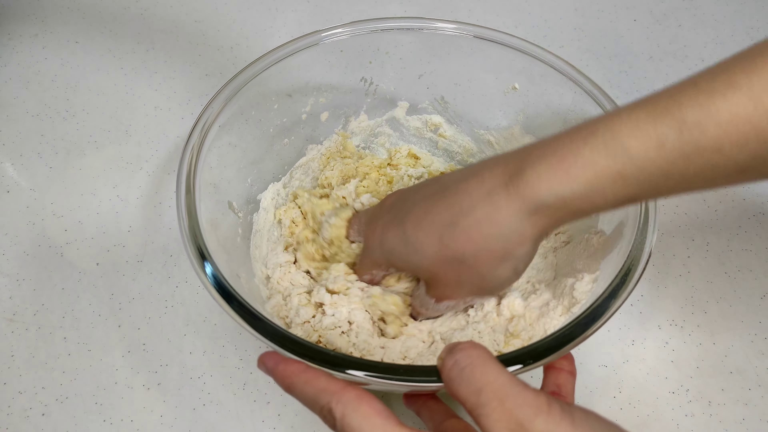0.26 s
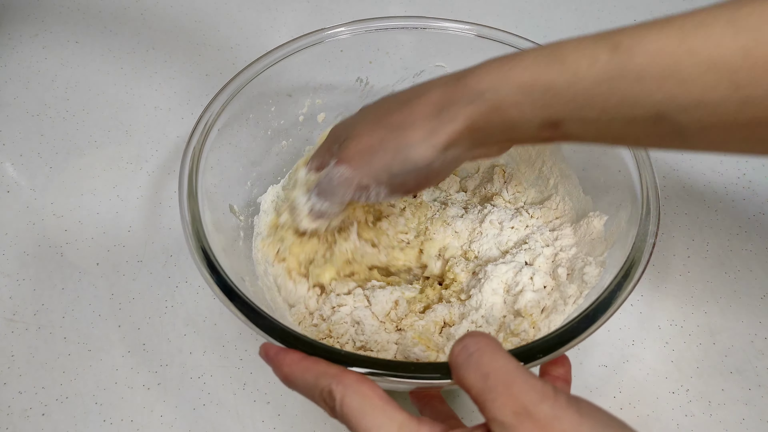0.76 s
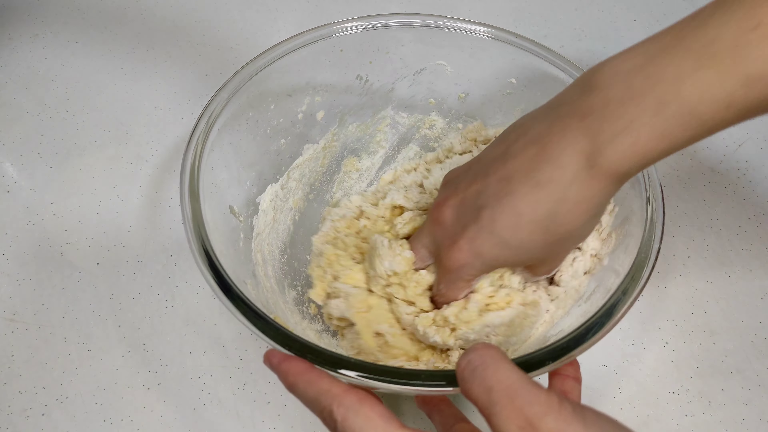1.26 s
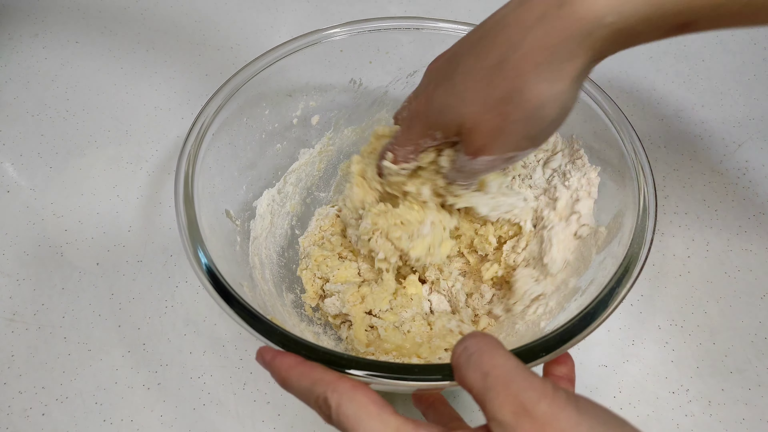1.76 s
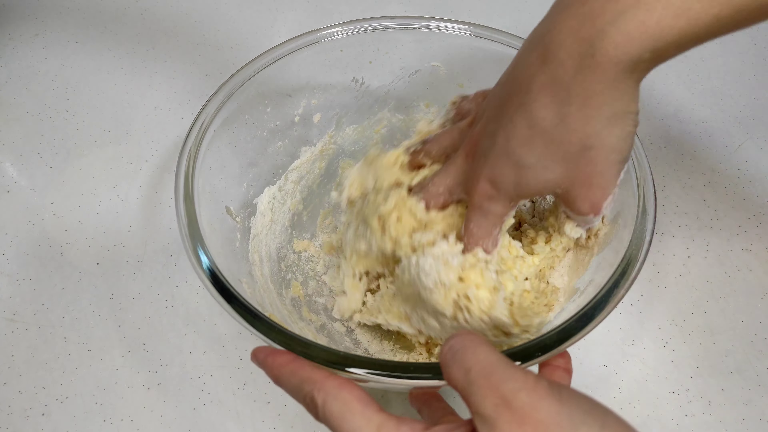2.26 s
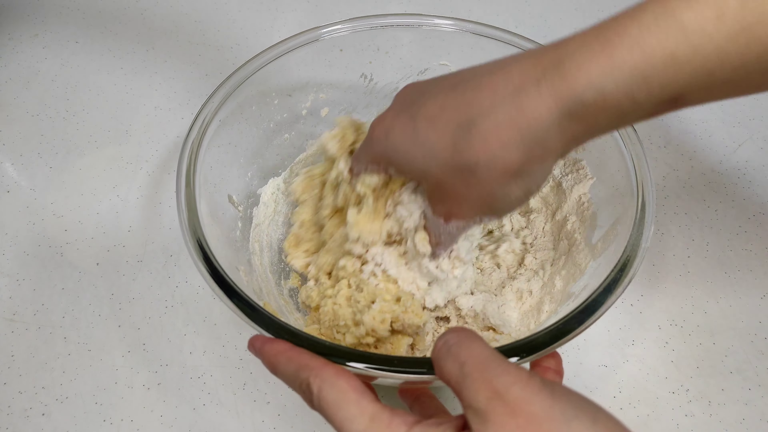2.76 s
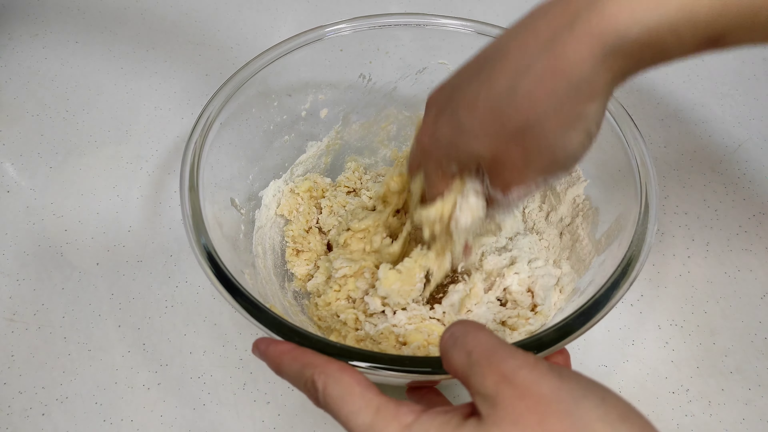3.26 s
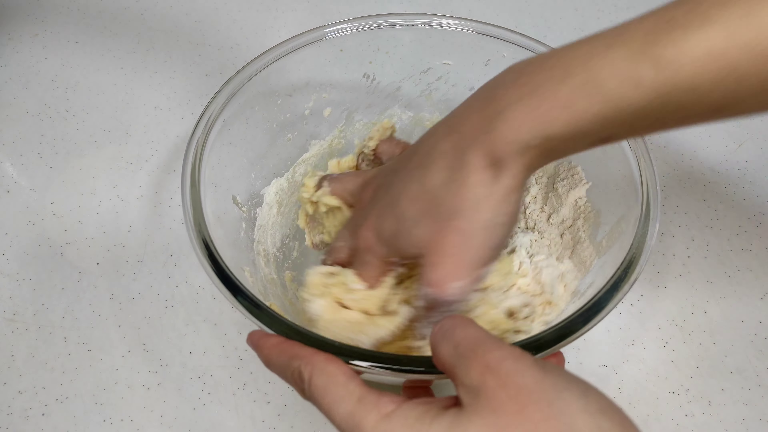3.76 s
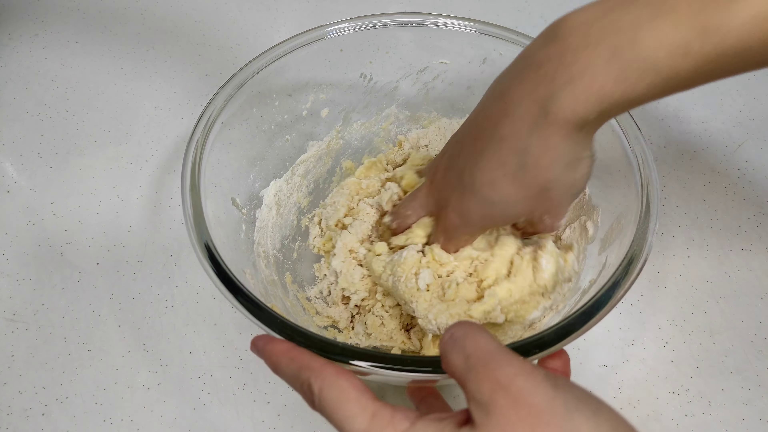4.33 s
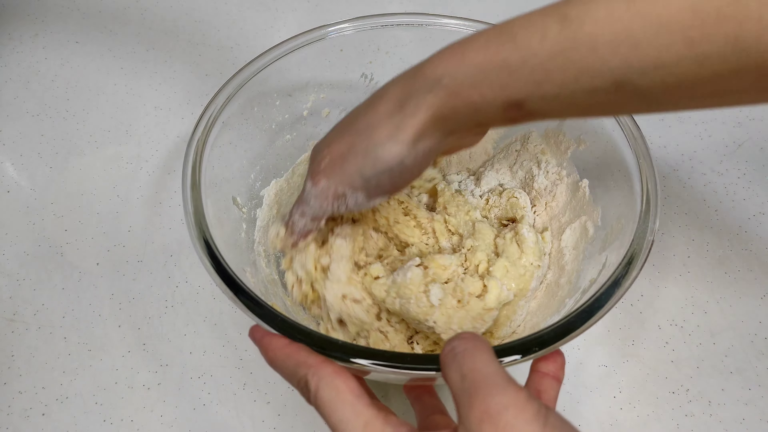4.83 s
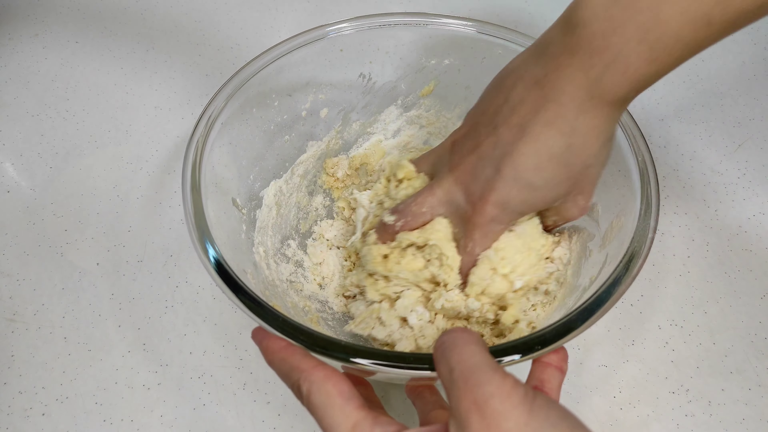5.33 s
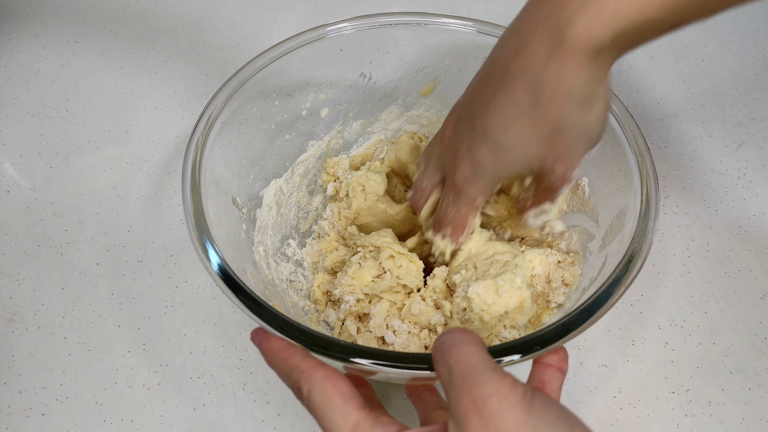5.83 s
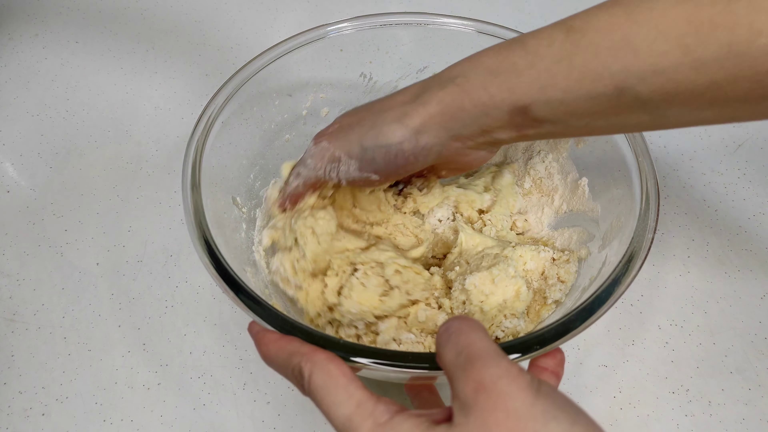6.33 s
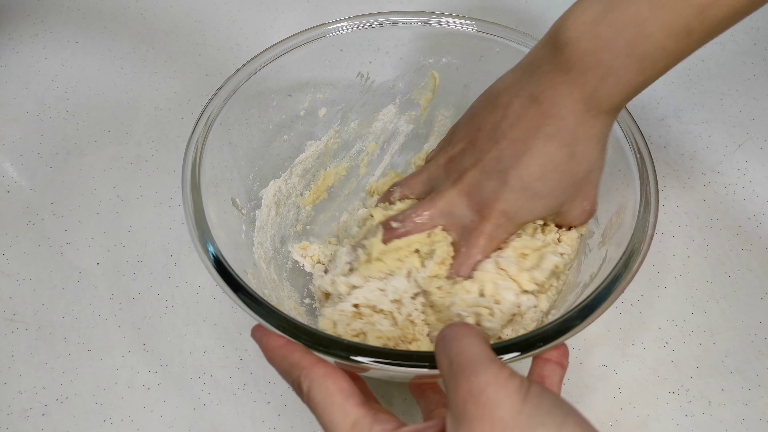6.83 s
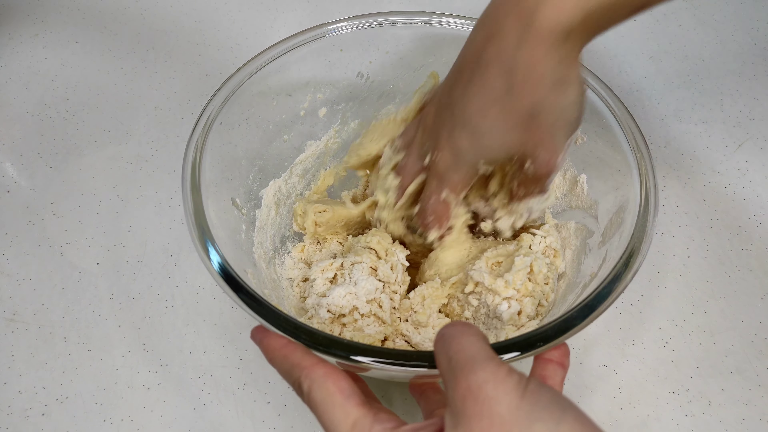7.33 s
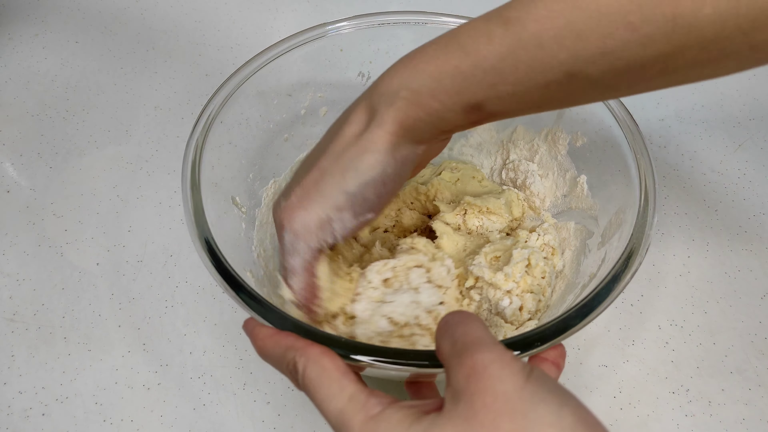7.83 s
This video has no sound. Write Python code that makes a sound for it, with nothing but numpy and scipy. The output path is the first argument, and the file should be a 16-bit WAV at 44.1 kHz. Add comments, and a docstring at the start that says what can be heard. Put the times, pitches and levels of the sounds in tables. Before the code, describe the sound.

Close stereo pickup in a home kitchen: a hand sweeps, grips and presses crumbly dough in a glass bowl. Fine sticky crackling and floury rubbing swell and fade in uneven strokes, with tiny bright snaps and dull pats. Just after one second the bowl knocks sharply on the counter, by far the loudest event. Later presses crunch and squelch, a soft heavy thump comes near the end, and an appliance hums steadily.

```python
"""Kitchen counter: a hand kneads crumbly cookie dough in a glass bowl, heard close up in stereo.
Random impulses and noise make the dough's crackle, rub and fizz, shaped by sweeps, grips and presses.
Damped pings are snapping bubbles and threads, sliding pops are squelches, thumps and pats are heavy dough.
The bowl knocks the counter twice (decaying modes and contact noise); low noise puffs at the left port.
An appliance hums behind: steady air noise and wavering tones."""
import sys
import numpy as np
from scipy import signal
from scipy.fft import rfft, irfft, next_fast_len
from scipy.io import wavfile
from scipy.ndimage import uniform_filter1d, map_coordinates

SR = 44100
rng = np.random.default_rng(int(sys.argv[2]) if len(sys.argv) > 2 else 0)


def store_pcm(level_fs):
    """Save levels as 16-bit WAV."""
    pcm = np.round(np.clip(level_fs, -1, 1) * 32767).astype(np.int16)
    wavfile.write(sys.argv[1], SR, np.atleast_2d(pcm).T)


N = 356769

# tone of a breaking thread or bubble: (frequency [Hz], gain [dB])
POP_COLOUR = [(500, -13), (3000, -3), (7300, -0.5), (9000, -1.5), (11000, -18.5)]


def kneading():
    """Crackle, rub and fizz levels in dB; the powers of all the hand's movements add up."""
    # hand sweeps dough along the wall: (touch time [s], hardest push time [s], release time [s],
    # swell width [s], crackle level [dB], rub level [dB])
    sweep_rows = [(0.513, 0.74, 1.55, .15, -59.5, -66.5), (1.657, 2.01, 2.16, 0.073, -58.5, -71.5),
                  (3.296, 3.566, 4.07, 0.17, -63.5, -70.5), (4.482, 4.779, 5.7, 0.059, -65.5, -67.5),
                  (5.99, 6.185, 6.53, 0.14, -65.5, -70), (7.509, 7.717, 8, 0.081, -61.5, -65)]
    # fingers close on the dough: (time [s], hold [s], crackle level [dB], rub level [dB])
    grip_rows = [(0.0, 0.31, -68.5, -72), (0.257, 0.065, -63, -66), (1.137, 0.039, -61.5, -68),
                 (1.366, 0.12, -58.5, -74), (1.735, 0.06, -63.5, -71.5), (1.978, 0.032, -64, -62),
                 (2.225, 0.038, -66, -70.5), (2.328, 0.044, -62, -70.5), (2.427, 0.16, -68.5, -77),
                 (2.593, 0.033, -62.5, -83), (2.73, 0.17, -70, -74), (3.486, 0.021, -60, -69),
                 (4.183, 0.034, -53, -69), (4.9, 0.036, -63, -73), (5.361, 0.086, -53.5, -72.5),
                 (5.76, 0.052, -62, -92), (5.837, 0.042, -65, -92), (5.977, 0.035, -57, -94.5),
                 (6.666, 0.24, -65, -76), (6.827, 0.13, -56.5, -66.5), (6.98, 0.19, -62.5, -73.5)]
    # fist squeezes the lump flat: (time [s], rise [s], release time [s], crackle level [dB], rub level [dB])
    press_rows = [(3.018, 0.014, 3.11, -49.5, -64.5), (4.226, 0.012, 4.53, -53.5, -58.5),
                  (5.613, 0.058, 5.7, -51, -63.5), (6.733, 0.0033, 6.79, -64, -62.5),
                  (7.119, 0.045, 8.9, -53, -62.5)]
    # hand hangs clear of the dough: (start [s], end [s])
    lift_rows = [(0.46, 0.57), (1.6, 1.67), (3.22, 3.33), (4.155, 4.25), (5.915, 5.98), (7.419, 7.53)]
    clear_db, clear_ramp_s = -11, 0.0091
    settle_crackle_db, settle_rub_db = -69, -83  # loose crumbs between movements
    # fizz relative to crackle: a closed hand forces more air out
    sweep_fizz_db, squeeze_fizz_db = -22.5, -17

    t = np.arange(0, N / SR, 0.001)
    airborne = sum(np.clip(np.minimum(t - start, end - t) / clear_ramp_s + 1, 0, 1)
                   for start, end in lift_rows)
    contact = amp(clear_db * airborne)
    # loose crumbs dip by half as many dB as the handled dough
    settling = contact * amp([[settle_crackle_db], [settle_rub_db]]) ** 2
    sweeping = contact ** 2 * sum(sweep(t, *row) ** 2 for row in sweep_rows) + settling
    gripping = sum(grip(t, *row) ** 2 for row in grip_rows)
    pressing = sum(press(t, *row) ** 2 for row in press_rows)
    squeezing = contact ** 2 * (gripping + pressing)
    crackle, rub = sweeping + squeezing
    fizz = amp(sweep_fizz_db) ** 2 * sweeping[0] + amp(squeeze_fizz_db) ** 2 * squeezing[0]
    return curves(np.column_stack([t, *10 * np.log10([crackle, rub, fizz])]))


def sweep(t, start, hardest, end, width, crackle_db, rub_db):
    """Crackle and rub gains: steady contact with a swell where the hand pushes hardest."""
    touch_s = 0.0082
    cling_db, drag_db = -65, -74.5  # crackle and rub throughout the contact
    crackle_linger, rub_linger = 1.72, 0.9  # swell's fall width over its rise width
    contact = np.clip((t - start) / touch_s, 0, 1) * touching(t, end)

    def swell(linger):
        """Two-sided Gaussian around the hardest push."""
        sigma_s = np.where(t < hardest, width, width * linger)
        return np.exp(-((t - hardest) / sigma_s) ** 2 / 2)

    crackle = np.hypot(amp(cling_db), amp(crackle_db) * swell(crackle_linger))
    rub = np.hypot(amp(drag_db), amp(rub_db) * swell(rub_linger))
    return contact * np.array([crackle, rub])


def grip(t, s, hold, crackle_db, rub_db):
    """Crackle and rub gains: both follow the fingers' force."""
    attack_s, release_db_per_s = 0.032, 125
    return amp([[crackle_db], [rub_db]]) * stroke(t - s, attack_s, hold, release_db_per_s)


def press(t, s, rise, end, crackle_db, rub_db):
    """Crackle and rub gains: a short push; the dough keeps tearing after it has stopped sliding."""
    hold_s = 0.016
    crackle_db_per_s, rub_db_per_s = 84, 134
    db_per_s = np.array([[crackle_db_per_s], [rub_db_per_s]])
    push = stroke(t - s, rise, rise + hold_s, db_per_s)
    return amp([[crackle_db], [rub_db]]) * push * touching(t, end)


def touching(t, end):
    """1 while the hand is on the dough, falling to 0 after time end as it lifts."""
    lift_s = 0.068
    return np.clip((end - t) / lift_s + 1, 0, 1)


def stroke(t, attack, hold, db_per_s):
    """An envelope that rises from t = 0, stays until t = hold and dies away."""
    return np.clip(t / attack, 0, 1) * amp(-db_per_s * np.maximum(t - hold, 0))


def dough(crackle_db, rub_db, fizz_db):
    """Squeezing tears countless sticky threads; sliding grinds flour along the glass."""
    # (frequency [Hz], gain [dB])
    crackle_colour = [(1500, -37.5), (2500, -14), (4200, -13.5), (5200, -10.5), (6200, -3.5), (7100, 5),
                      (7900, 3), (9000, -3.5), (10000, -18.5), (13000, -36), (16000, -37)]
    # (frequency [Hz], gain [dB])
    rub_colour = [(60, -2.5), (180, 6.5), (400, 8), (700, 5.5), (1000, 1), (1500, 0.5), (2200, -2),
                  (3500, -3), (6000, 0.5), (12000, -44.5)]
    fizz_colour = [(7000, -26.0), (10000, 2.0), (16000, -5.5)]  # (frequency [Hz], gain [dB])

    tearing = unit(grains(rate=1100, size_db=2.8, port_db=3)) + 0.65 * rng.standard_normal((2, N))
    crackle = patchy(filtered(tearing, colour(crackle_colour)), depth_db=1.5)
    crackle = crackle * amp(crackle_db - 3.0 + 1.2 * wobble(60))
    mist = grains(rate=5000, size_db=1, port_db=2.5)
    fizz = unit(filtered(mist, colour(fizz_colour)))
    fizz = fizz * amp(fizz_db + 2.8 * wobble(24))
    grinding = filtered(grains(rate=4000, size_db=1.5, port_db=2), colour(rub_colour))
    rub = patchy(spread(grinding), depth_db=3.0)
    rub = rub * amp(rub_db + 3.0 + 2.05 * wobble(35))
    return crackle + fizz + rub


def grains(rate, size_db, port_db):
    """Tiny impulses, rate per second, of uneven size and with a strength of their own at each port."""
    fires = rng.random(N) < rate / SR
    size = amp(size_db * np.minimum(rng.exponential(size=N), 4))
    sign = rng.choice([-1, 1], (2, N))
    return fires * size * sign * amp(port_db * rng.standard_normal((2, N)))


def patchy(x, depth_db):
    """Random slow gains make each band of the noise flare and fade on its own."""
    smooth_bins, smooth_frames = 4, 7
    z = signal.stft(x, nperseg=256)[2]
    field = rng.standard_normal(z.shape[1:])
    field = uniform_filter1d(field, size=smooth_bins, axis=0)
    field = uniform_filter1d(field, size=smooth_frames, axis=1)
    return unit(signal.istft(z * amp(depth_db * unit(field)), nperseg=256)[1][:, :N])


def crumbs(crackle_db, rate, size_db, level_db, pitch_spread):
    """Thicker threads break at random as damped pings, each with its own pitch, size and pan."""
    thread_limit_db = -67  # thread level follows the crackle only up to here
    draws = rng.standard_normal((int(rate * N / SR), 3))
    times = rng.uniform(0, N / SR, len(draws))
    out, t = np.zeros((2, N)), np.arange(SR // 200) / SR
    for s, (pitch, size, pan) in zip(times, draws):
        hz = 6200 * np.exp(pitch_spread * np.clip(pitch, -2, 1))
        ping = np.sin(2 * np.pi * hz * t) * amp(-60 * t / 0.0011) * (1 - np.exp(-t * hz))
        db = min(crackle_db[int(s * SR)], thread_limit_db) + level_db + size_db * min(size, 2)
        add(out, s, ping * amp(db + 2 * pan * np.array([[1], [-1]])))
    return filtered(out, colour(POP_COLOUR))


def snaps():
    """Each sticky bubble bursts with a very short ping and a splutter, then a weaker neighbour follows."""
    # (time [s], relative level [dB], left-right difference [dB])
    snap_rows = [(0.097, -35.5, -2), (0.309, -44, -2), (0.4226, -42, -3), (1.2737, -33.5, -6),
                 (1.4982, -42, -2), (1.7017, -43.5, -1), (1.9348, -43, 0), (2.159, -45, 0),
                 (2.5026, -41, -5.5), (2.563, -47, -2), (2.7238, -47.5, -3), (2.8967, -41.5, -6),
                 (2.92, -47, -7), (2.972, -42.5, -5), (2.978, -45.5, -5), (3.076, -47, 0), (4.3927, -33, 3),
                 (4.5049, -44.5, 0), (5.175, -44, -7), (5.237, -48.5, 0), (5.3188, -31.5, -4),
                 (5.3713, -42, -8), (5.465, -43, 0), (7.0764, -39, 3), (8.057, -46.5, 4)]
    centre_hz, pitch_spread = 7200, 0.029  # snap pitches scatter slightly around this centre
    ping_t60_s, spray_t60_s, rise_s = 0.0033, 0.016, 0.00026
    aftersnap_db, aftersnap_lag_s = -13.5, 0.005  # median lag

    out, t = np.zeros((2, N)), np.arange(SR // 30) / SR
    draws = rng.standard_normal((len(snap_rows), 2))
    for (s, db, pan_db), (pitch, lag) in zip(snap_rows, draws):
        hz = centre_hz * np.exp(pitch_spread * pitch)
        ping = np.sin(2 * np.pi * hz * t) * amp(-60 * t / ping_t60_s)
        noise = rng.standard_normal((2, len(t)))
        spray = unit(signal.lfilter(*signal.iirpeak(hz, 2.5, SR), noise)) * amp(-60 * t / spray_t60_s)
        burst = (ping + 0.23 * spray) * (1 - np.exp(-t / rise_s))
        burst = amp(db + 2.5) * burst * amp([[pan_db / 2], [-pan_db / 2]])
        add(out, s, burst)
        add(out, s + aftersnap_lag_s * np.exp(lag / 2), amp(aftersnap_db) * burst)
    return filtered(out, colour(POP_COLOUR))


def squelches():
    """Air squeezed from hollows in the dough splutters out as clusters of pops."""
    # (time [s], relative level [dB], length [s], first pitch [Hz], last pitch [Hz])
    squelch_rows = [(0.098, -61, .027, 920, 800), (3.027, -55, 0.038, 1240, 1560),
                    (3.405, -52, 0.023, 560, 490), (4.29, -57, 0.068, 334, 292),
                    (5.643, -56.5, 0.048, 1160, 1610), (5.651, -60.5, 0.045, 524, 436),
                    (6.735, -59, .03, 2910, 1490), (6.754, -45, 0.0063, 550, 493),
                    (6.755, -55.5, .03, 850, 930), (6.805, -54.5, 0.00575, 1050, 950),
                    (7.174, -57, 0.041, 1450, 1150)]
    out = np.zeros((2, N))
    for s, db, length, first_hz, last_hz in squelch_rows:
        pair = [bubbles(length, first_hz, last_hz, scatter=0.14, cycles=10.8, size_db=3.5, count=24)
                for port in range(2)]
        add(out, s, amp(db - 4.5) * np.array(pair))
    return spread(out)


def bubbles(length, first_hz, last_hz, scatter, cycles, size_db, count):
    """A cluster of tiny wet pops, pitched from first_hz to last_hz as their hollow changes size."""
    when = rng.random((count, 1))
    pitch, size = rng.standard_normal((2, count, 1))
    hz = first_hz * (last_hz / first_hz) ** when * np.exp(scatter * pitch)
    turns = hz * np.maximum(np.arange(SR // 8) / SR - when * length, 0)
    pops = np.sin(2 * np.pi * turns) * amp(-60 * turns / cycles) * (1 - np.exp(-2 * turns))
    cluster = np.sum(pops * amp(size_db * size) * np.sqrt(np.sin(np.pi * when)), axis=0)
    return cluster * np.sqrt(length * SR) / np.linalg.norm(cluster)


def pats():
    """Dough lands on the bowl's wall: noise through the bowl's modes, with a faint rim ring."""
    # (time [s], relative level [dB], hold [s], relative rim level [dB])
    pat_rows = [(0.557, -58, 0.034, -7), (0.707, -57.5, 0.026, -8), (0.826, -50.5, 0.031, -9.5),
                (1.744, -53, 0.024, -25), (2.001, -54.5, 0.063, -13.5), (2.284, -49, 0.01, -22),
                (2.929, -58, 0.095, -23), (3.553, -51, 0.016, -11), (3.644, -51.5, 0.022, -13),
                (4.811, -52.5, 0.052, -13.5), (6.416, -57.5, 0.013, -18), (7.749, -49, 0.05, -12),
                (7.813, -54.5, 0.039, -32)]
    # loaded bowl on the counter: (frequency [Hz], width [Hz], relative level [dB])
    bowl_modes = [(168.3, 13.4, 16), (311, 330, -21), (414, 110, -47)]
    # glass rim: (frequency [Hz], width [Hz], relative level [dB])
    rim_modes = [(1055, 28, 0)]
    rise_s, release_t60_s = 0.0018, 0.22

    out = np.zeros((2, N))
    body = even(filtered(rng.standard_normal(N), resonances(bowl_modes)), size=800)
    rim = unit(filtered(rng.standard_normal((2, N)), resonances(rim_modes)))
    for s, db, hold, rim_db in pat_rows:
        t = np.arange(N)[round(s * SR) - 200:][:SR // 4] / SR - s
        # force rises fast, holds while the lump spreads, then eases
        force = np.clip(t / rise_s, 0, 1) * amp(-60 * np.maximum(t - hold, 0) / release_t60_s)
        at = np.round((t + s) * SR).astype(int)
        out[:, at] += amp(db - 3.0) * force * (body[at] + amp(rim_db + 1.0) * rim[:, at])
    return out


def pushes():
    """The fist or bowl comes down heavily: dull thumps of two heavily damped partials."""
    # (time [s], relative level [dB], pitch [Hz])
    push_rows = [(0.548, -39, 91), (1.2896, -13, 240), (3.300, -36.5, 104), (3.409, -39.5, 108.4),
                 (4.332, -33, 96.6), (6.021, -40, 88), (6.759, -29, 182), (6.7764, -28, 163.7),
                 (6.802, -27.5, 91.4), (7.534, -38.5, 128)]
    rise_s, t60_s = 0.014, 0.069
    out, t = np.zeros(N), np.arange(SR // 4) / SR
    for s, db, hz in push_rows:
        swing = np.sin(2 * np.pi * hz * t) + 0.5 * np.sin(2 * np.pi * 1.84 * hz * t)
        add(out, s, amp(db) * swing * (1 - np.exp(-t / rise_s)) * amp(-60 * t / t60_s))
    return out


def knocks():
    """The bowl's foot chatters on the counter as noise bursts, and counter and glass ring."""
    # foot contacts: (time [s], relative level [dB], softening corner [Hz])
    chatter_rows = [(1.2739, -33, 6000), (1.276, -20, 6000), (1.2787, -22.5, 4020), (1.2818, -17, 2500),
                    (1.285, -20, 2000), (6.757, -47, 1400), (6.806, -46.5, 1100)]
    # contact noise: (frequency [Hz], gain [dB])
    clack_colour = [(30, -35.5), (110, -12), (250, 1.5), (500, -3.5), (900, -4.5), (1300, -8.5),
                    (1900, -4.5), (2900, -8.5), (3900, -16), (5900, -20), (7400, -5), (9000, -26),
                    (11000, -57.5)]
    # counter under the bowl: (frequency [Hz], relative level [dB], t60 [s])
    counter_modes = [(73, -12.5, .41), (165.2, 1, 0.33), (181, -6.5, .2), (231.6, -1.5, 0.24),
                     (252, -7, .38), (308.8, -1, .35), (391, -10, .3), (478.6, -7.5, .33), (529, -15, 0.38),
                     (600, -20, 0.3), (675, -13.5, .34), (805, -16.5, .32)]
    # held glass: (frequency [Hz], relative level [dB], t60 [s])
    glass_modes = [(938, -13.5, 0.3), (968, -12, 0.27), (1085, -18, .25), (1470, -11.5, .25),
                   (1470, -13.5, 0.28), (1630, -9, 0.22), (1896, -9, .2), (2122, -17.5, .22),
                   (2630, -20.5, .17), (3730, -29.5, .16), (4500, -28, 0.14)]
    # knocks alone, ahead of the overall lean: (frequency [Hz], left-right difference [dB])
    knock_lean = [(320, 0), (550, -2.5), (1100, -5), (2500, 1)]
    boom_rise_s, glass_rise_s = 0.0096, 0.0027  # boom: for a 300 Hz mode
    glass_phase_rad = 1.75  # glass reaches the ports out of step

    # low modes build up last, so the boom sinks in pitch
    boom = ringing(counter_modes, lambda hz: min(boom_rise_s * (300 / hz) ** 2, 0.02), lambda hz: -hz / 900)
    glass = ringing(glass_modes, lambda hz: glass_rise_s, lambda hz: glass_phase_rad)
    contacts, t = np.zeros((2, N)), np.arange(SR // 10) / SR
    for s, db, corner_hz in chatter_rows:
        scuff = rng.standard_normal((2, len(t))) * amp(-60 * t / 0.013) * (1 - np.exp(-t / 0.00032))
        softened = signal.lfilter(*signal.butter(2, corner_hz, fs=SR), scuff)
        add(contacts, s, amp(db + 17.0) * softened)
    clack = spread(filtered(contacts, colour(clack_colour)))
    room = kitchen(amp(-4.5) * clack + amp(-16.0) * boom + amp(-10) * glass)
    return filtered(boom + clack + glass + room, leaning(knock_lean))


def ringing(modes, rise_s, phase):
    """Stereo ring of modes at every knock; rise_s and phase between ports [rad] are functions of Hz."""
    # foot hits the counter, dough softens the lighter blow:
    # (time [s], relative level [dB], softening corner [Hz])
    knock_rows = [(1.277, -22.5, 5980), (6.757, -46.5, 600)]
    waver_rad, waver_knots_per_s = 0.299, 60  # depth for a 300 Hz mode
    out, t = np.zeros((2, N)), np.arange(SR * 3 // 4) / SR
    for k, (hz, level_db, t60) in enumerate(modes):
        # the pressing hand damps the first strong swing
        damping = 0.47 + np.exp(-t / 0.03)
        fade = amp(-60 * t / t60) * damping * (1 - np.exp(-(t / rise_s(hz)) ** 2))
        # each mode's phase drifts smoothly at random, the high ones most
        drift = map_coordinates(rng.standard_normal(size=200), [t * waver_knots_per_s])
        waver = waver_rad * np.sqrt(hz / 300) * drift
        # neighbouring modes swing opposite ways
        port_phase = np.array([[0.5], [-0.5]]) * phase(hz)
        swing = fade * np.sin(2 * np.pi * hz * t + waver + k * np.pi + port_phase)
        for s, db, corner_hz in knock_rows:
            add(out, s, amp(db + level_db) / np.hypot(1, hz / corner_hz) * swing)
    return out


def puff():
    """Moving air buffets the left port as low noise and barely reaches the right."""
    # (time [s], gust level [dB])
    gust_rows = [(7.196, -46.5), (7.245, -39.5), (7.287, -30), (7.352, -39.5)]
    # (frequency [Hz], gain [dB])
    puff_colour = [(20, -13), (45, 5), (110, 0.5), (190, -3.5), (300, -17), (500, -33.5), (1200, -74)]
    rise_s, fall_s = 0.015, 0.018
    t = np.arange(N) / SR
    gusts = sum(amp(db) * np.exp(-np.maximum((s - t) / rise_s, (t - s) / fall_s)) for s, db in gust_rows)
    rumble = even(filtered(rng.standard_normal(N), colour(puff_colour)), size=1200)
    return rumble * gusts * amp([[0], [-27]])


def kitchen(x):
    """The room's answer: a noise tail in which each frequency dies at its own speed."""
    # (frequency [Hz], t60 [s])
    decay_points = [(100, 0.74), (300, 0.52), (1000, 0.39), (3000, 0.28), (8000, 0.27)]
    build_s = 0.0078
    hz, t, z = signal.stft(rng.standard_normal((2, SR * 3 // 4)), SR, nperseg=256)
    decay = amp(-60 * t / along(decay_points, hz)[:, None])
    tail = signal.istft(z * decay, SR, nperseg=256)[1]
    tail = tail * (1 - np.exp(-np.arange(tail.shape[1]) / SR / build_s))
    return spread(signal.fftconvolve(x, tail / np.linalg.norm(tail[0]), axes=1)[:, :N])


def appliance():
    """Steady fan air and motor tones with slightly unsteady phase."""
    # (frequency [Hz], gain [dB])
    air_colour = [(20, 0.5), (50, -0.5), (95, -4), (140, -4.5), (300, -7.5), (450, -10.5), (540, -16.5),
                  (640, -12.5), (780, -19), (1500, -29), (4000, -29), (15000, -45.5)]
    # motor and fan tones: (frequency [Hz], relative level [dB])
    hum_tones = [(100, -71), (200, -81), (302, -82), (437, -84.5), (588, -83.5), (635, -75), (684, -84)]
    t = np.arange(N) / SR
    air = unit(spread(filtered(rng.standard_normal((2, N)), colour(air_colour))))
    hum = sum(amp(db + 2.5) * np.sin(2 * np.pi * hz * t + 1.34 * wobble(5)) for hz, db in hum_tones)
    return amp(-66.5) * air + hum


def amp(db):
    """Decibels to gain."""
    return 10 ** (np.asarray(db) / 20)


def unit(x):
    """Scale to rms 1."""
    return x / np.sqrt(np.mean(x ** 2) + 1e-20)


def even(x, size):
    """Hold the level of a noise steady over size samples."""
    return x / np.sqrt(np.abs(uniform_filter1d(x ** 2, size=size)) + 1e-12)


def along(points, hz):
    """(Hz, value) points read on a log axis."""
    f, v = np.transpose(points)
    return np.interp(np.log(hz + 1), np.log(f + 1), v)


def curves(rows):
    """One value per sample for each column after the time."""
    s, *cols = np.transpose(rows)
    return [np.interp(np.arange(N) / SR, s, c) for c in cols]


def wobble(rate):
    """A smooth random curve, rate knots a second."""
    knots = rng.standard_normal(int(N * rate / SR) + 4)
    return map_coordinates(knots, [np.arange(N) * rate / SR])


def add(track, s, sound):
    """Mix a sound into a track at time s."""
    start = max(0, round(s * SR))
    part = track[..., start:start + sound.shape[-1]]
    part += sound[..., :part.shape[-1]]


def filtered(x, response):
    """Filter x by a complex response of frequency, zero-padded."""
    m = 2 * next_fast_len((N + SR) // 2)
    return irfft(rfft(x, m) * response(np.fft.rfftfreq(m, 1 / SR)), m)[..., :N]


def colour(points):
    """Causal (minimum-phase) response with the given (Hz, dB) shape."""
    def response(hz):
        cepstrum = irfft(np.log(amp(along(points, hz))))
        half = len(cepstrum) // 2
        cepstrum[1:half] *= 2
        cepstrum[half + 1:] = 0
        return np.exp(rfft(cepstrum))
    return response


def resonances(modes):
    """Causal response of (Hz, width Hz, dB) modes with alternating signs."""
    def response(f):
        return sum((-1) ** k * amp(db) * 1j * f * w / (c * c - f * f + 1j * f * w)
                   for k, (c, w, db) in enumerate(modes))
    return response


def spread(pair):
    """Two unrelated signals become left and right, alike in the bass."""
    # (frequency [Hz], left-right correlation [0..1])
    likeness = [(60, 0.66), (130, 0.81), (300, .7), (640, 0.19), (1400, 0.069), (3000, 0)]

    def mid_side(hz):
        """Mid and side gains that give the wanted correlation."""
        turn = np.arccos(np.clip(along(likeness, hz), -1, 1)) / 2
        return np.array([np.cos(turn), np.sin(turn)])

    mid, side = filtered(pair, mid_side)
    return np.array([mid + side, mid - side])


def leaning(points):
    """Left and right gains for (Hz, left-right dB) points."""
    return lambda hz: amp(np.outer([0.5, -0.5], along(points, hz)))


def scene():
    """Everything in the bowl sounds close, with a little kitchen around it."""
    # all but the puff: (frequency [Hz], left-right difference [dB])
    overall_lean = [(60, 2.5), (200, 4.5), (380, 7.5), (700, 2.5), (1300, 2), (2400, -1.5), (4400, -2),
                    (7000, -9.5), (9000, 0), (15000, -3)]
    crackle_db, rub_db, fizz_db = kneading()
    threads = crumbs(crackle_db, rate=54, size_db=0.5, level_db=10.5, pitch_spread=0.24)
    bowl = dough(crackle_db, rub_db, fizz_db) + threads + snaps() + squelches() + pats() + pushes()
    sound = bowl + amp(-11.0) * kitchen(bowl) + knocks() + appliance()
    return filtered(sound, leaning(overall_lean)) + puff()


def record(dry):
    """Remove everything above top_hz."""
    top_hz = 15800
    return filtered(dry, lambda hz: hz < top_hz)


dry = scene()
out = record(dry)
store_pcm(out)
```